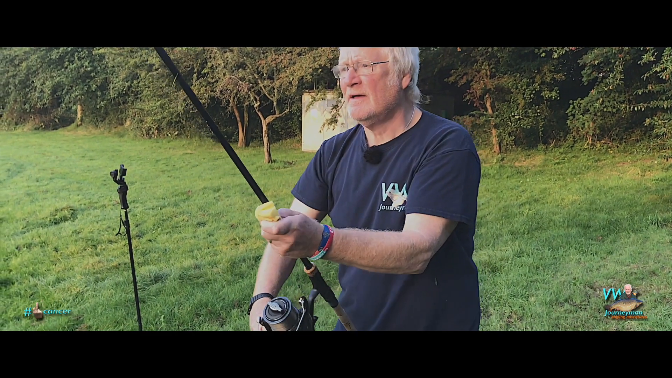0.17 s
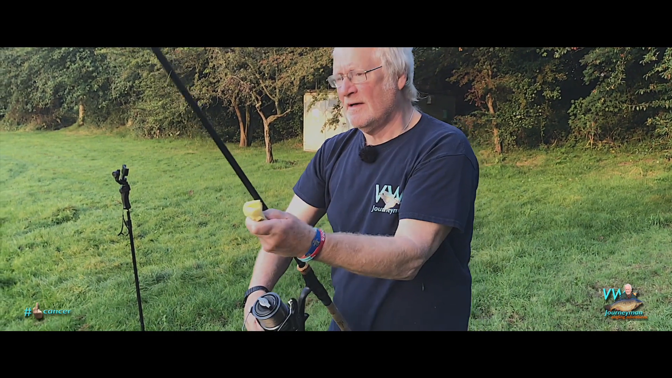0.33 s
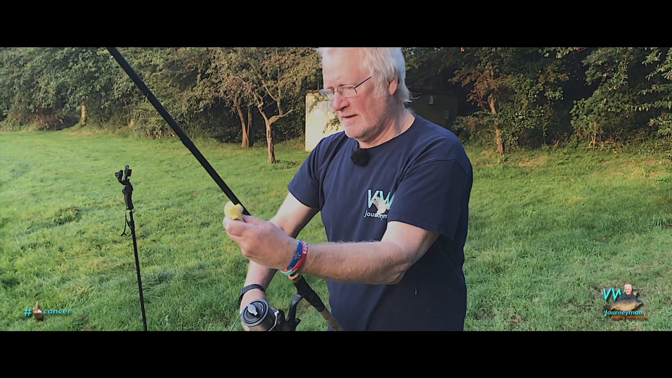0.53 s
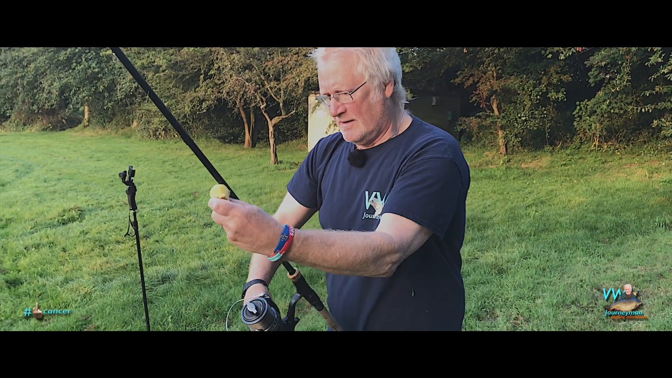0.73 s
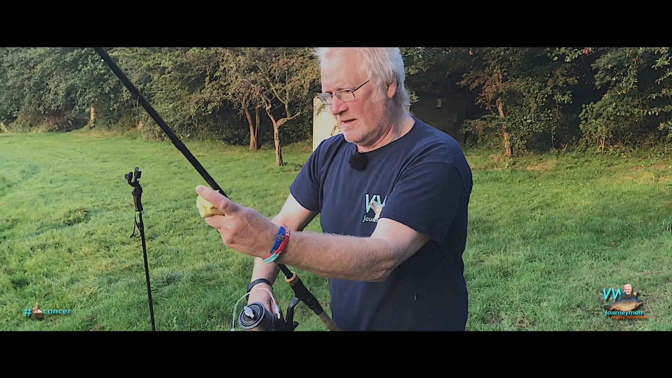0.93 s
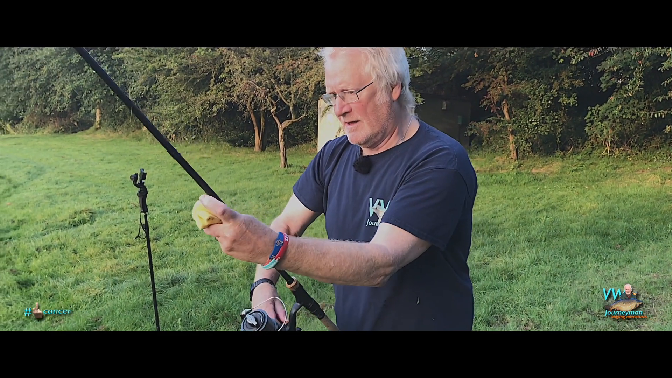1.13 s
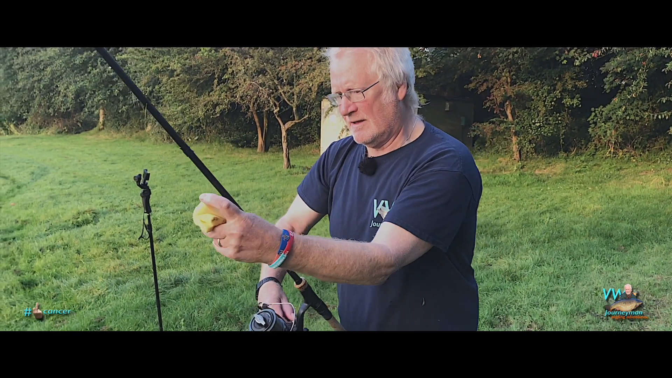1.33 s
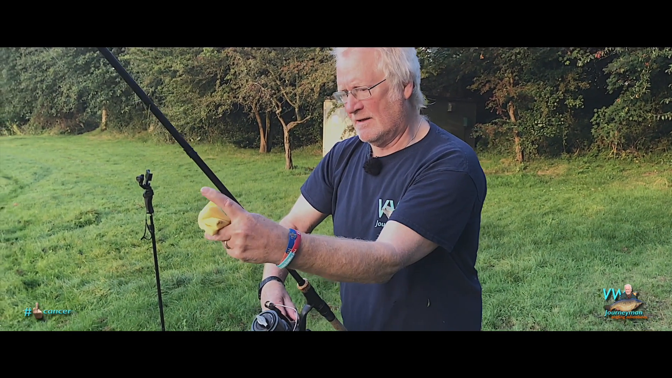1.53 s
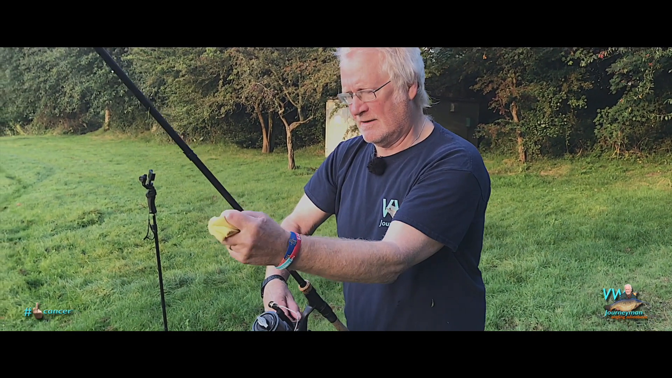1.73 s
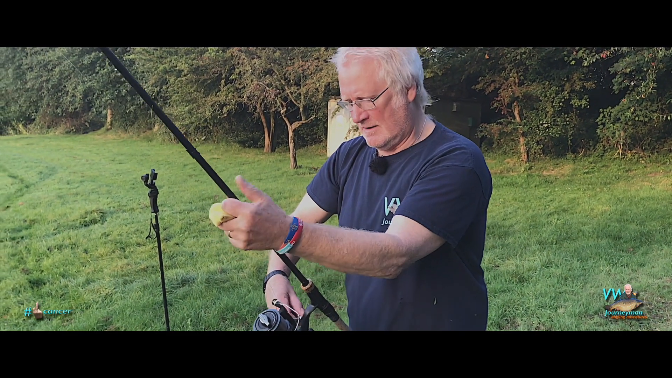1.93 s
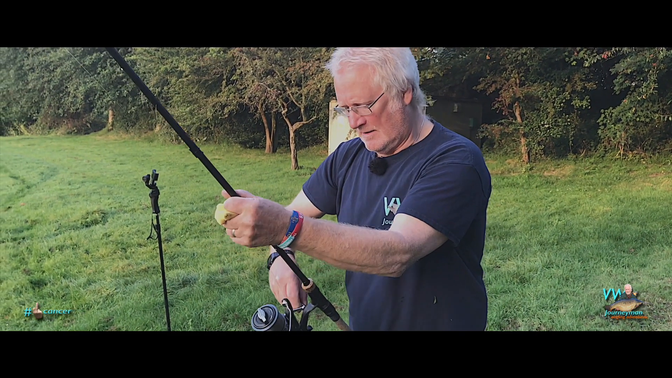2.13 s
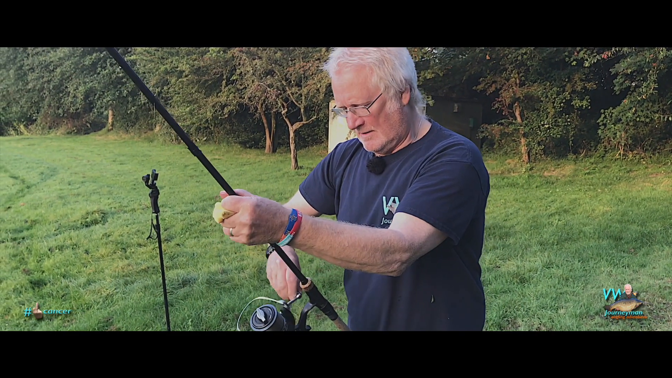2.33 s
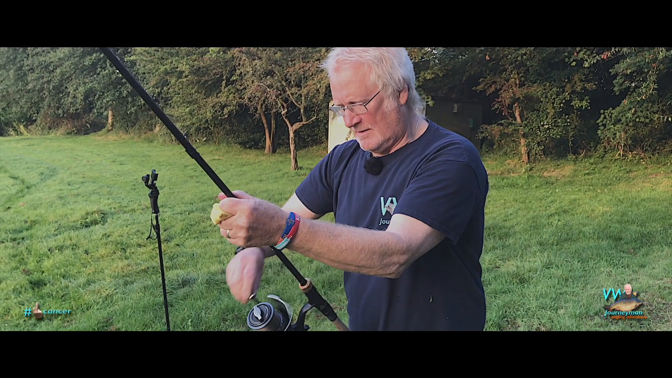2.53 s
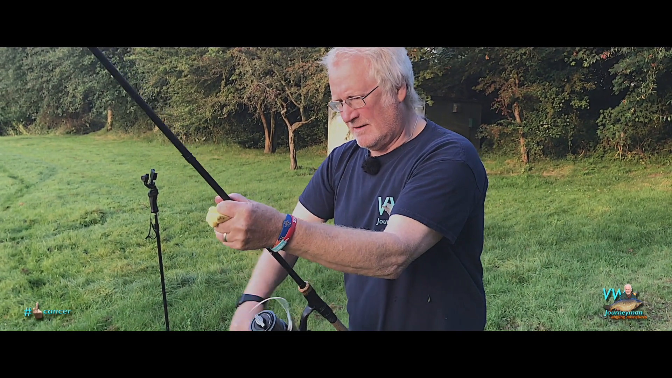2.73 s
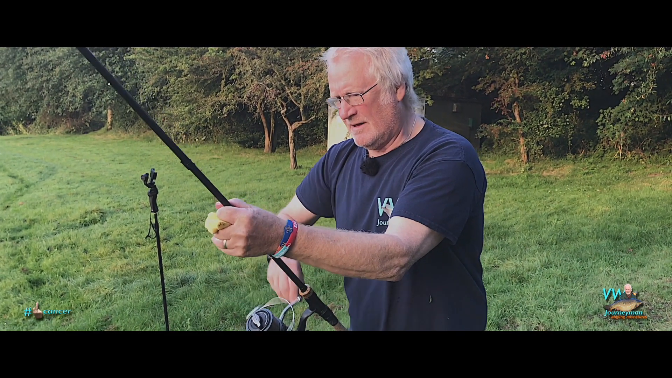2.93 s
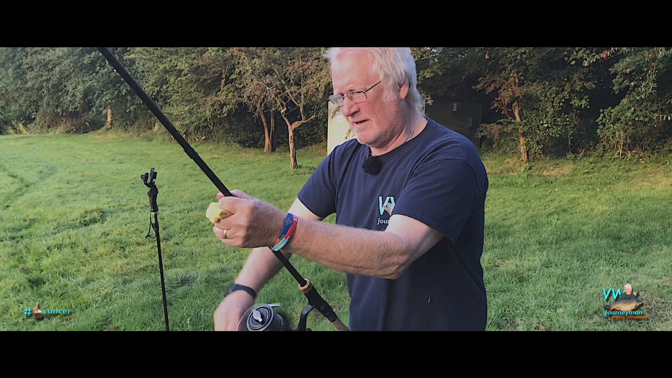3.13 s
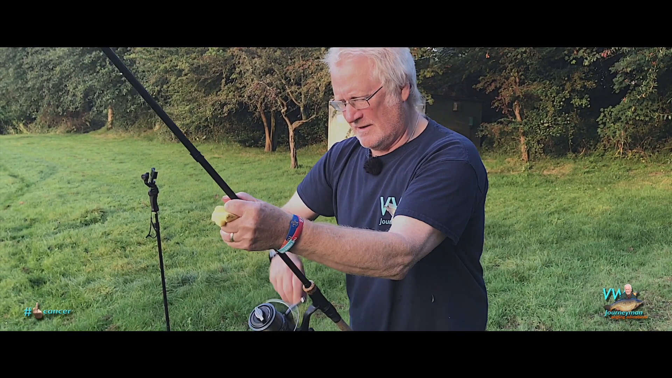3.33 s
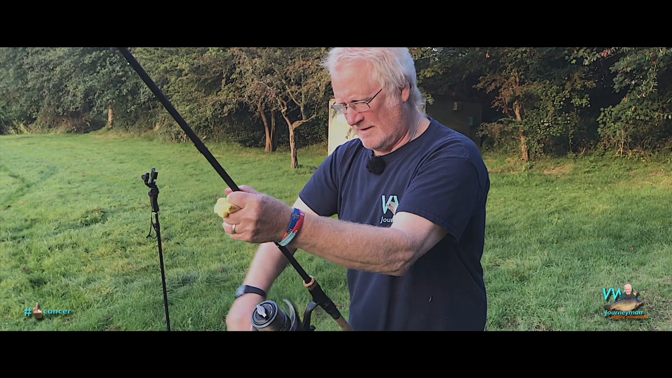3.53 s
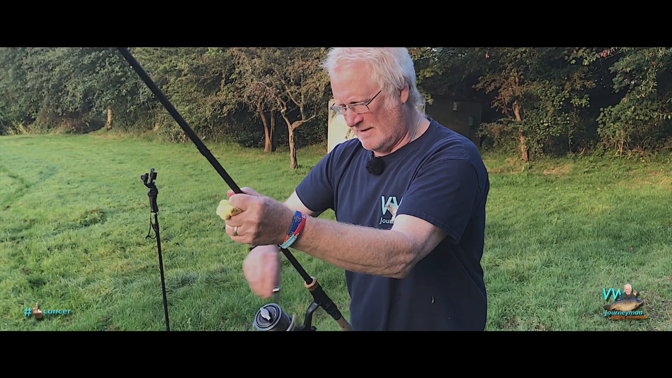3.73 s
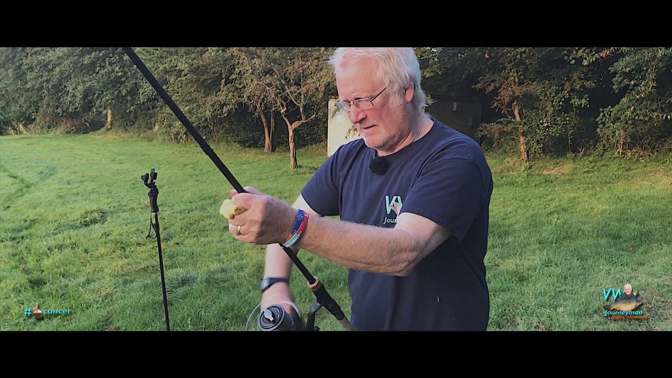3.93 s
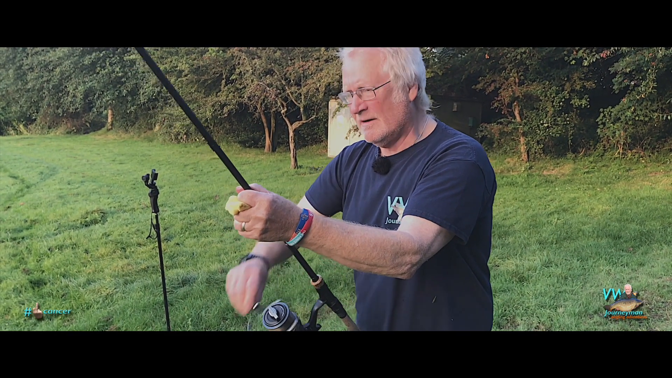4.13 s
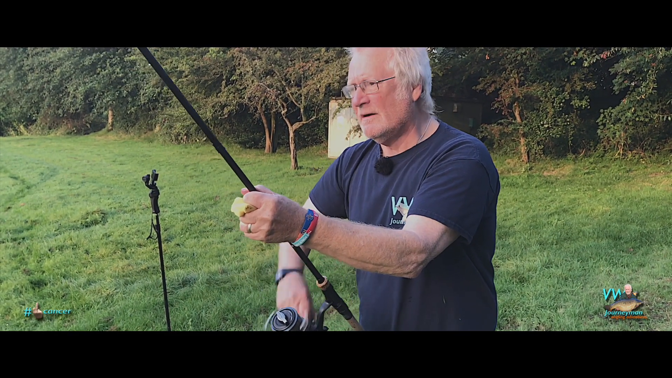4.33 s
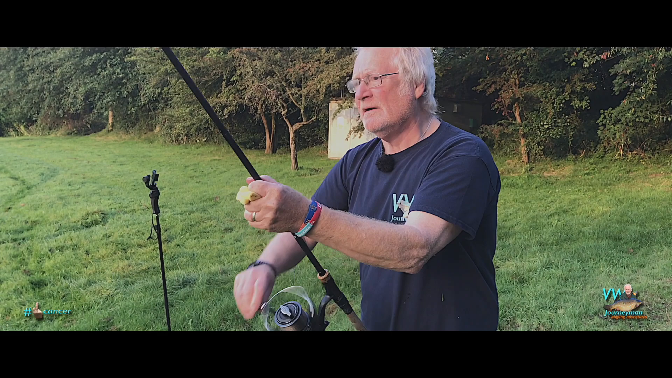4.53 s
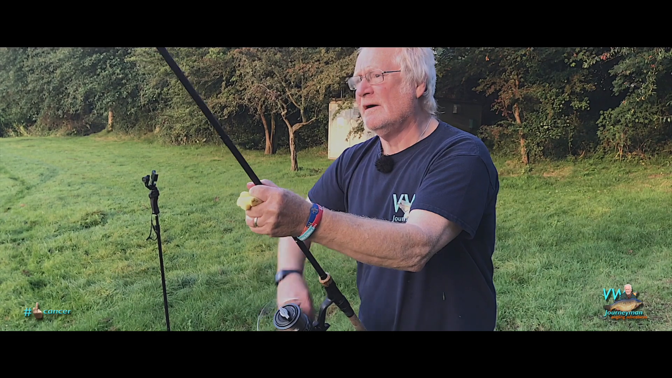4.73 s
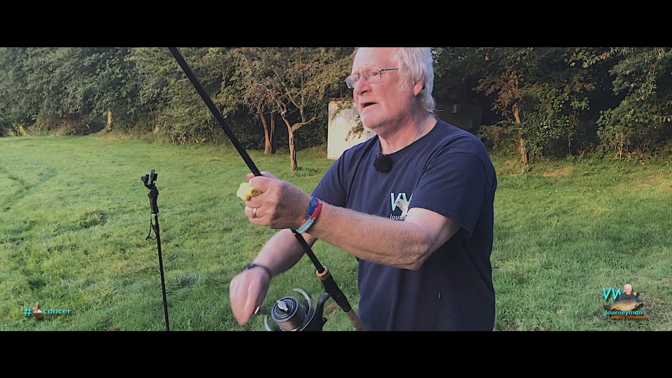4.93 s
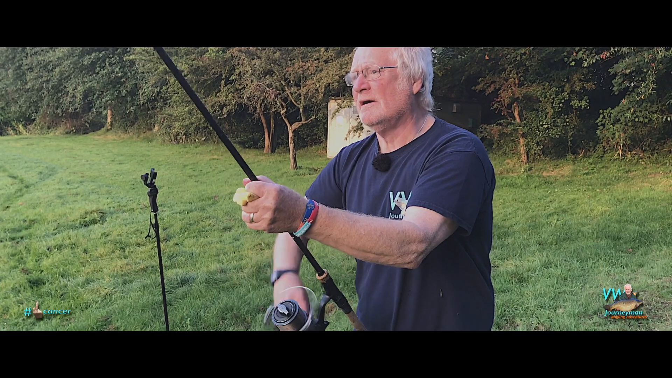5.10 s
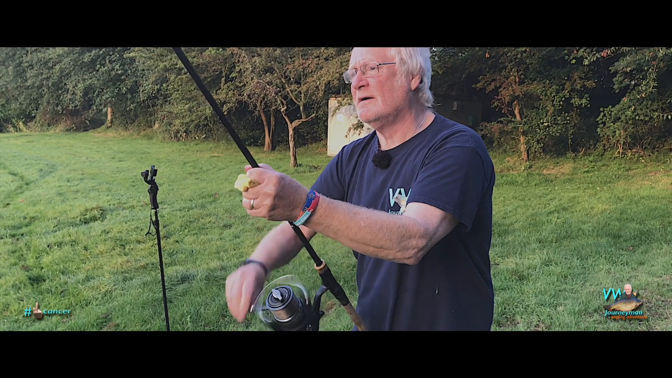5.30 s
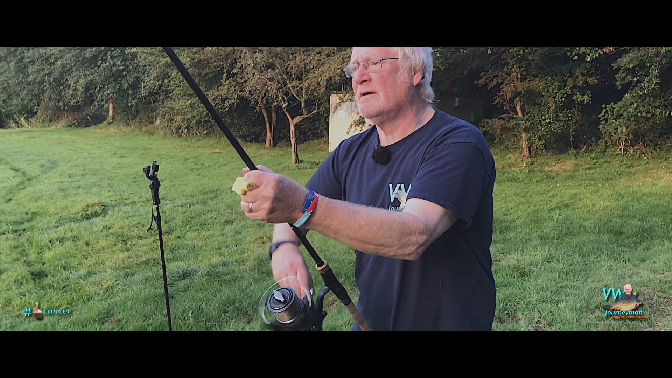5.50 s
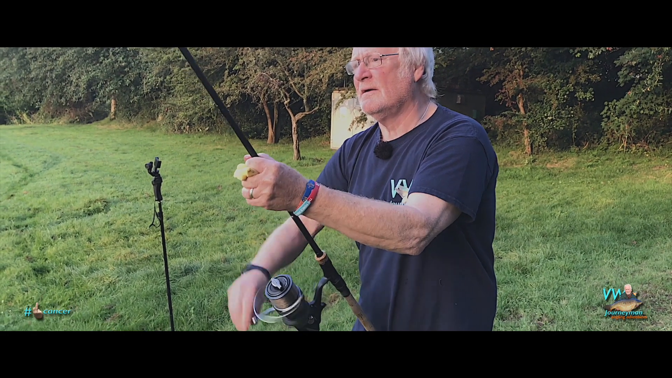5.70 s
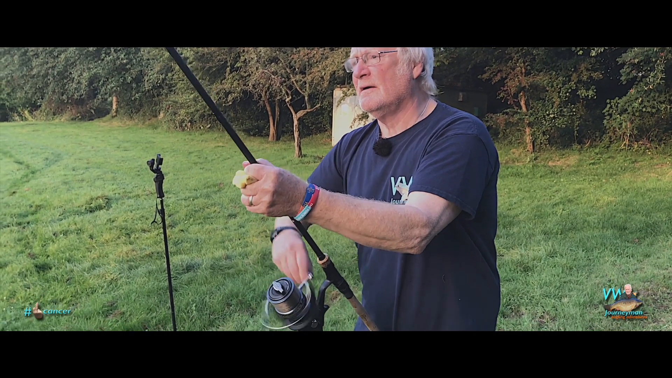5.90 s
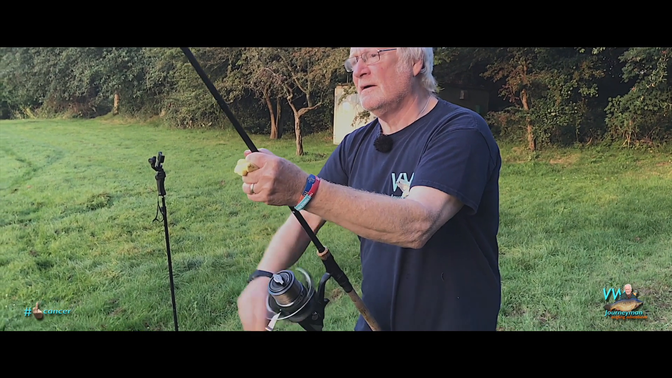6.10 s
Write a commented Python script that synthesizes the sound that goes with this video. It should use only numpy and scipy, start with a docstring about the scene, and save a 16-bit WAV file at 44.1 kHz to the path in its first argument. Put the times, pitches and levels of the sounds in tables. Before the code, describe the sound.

The opening is very quiet: a soft park hush, a low hum of far traffic, a faint distant twitter and a few tiny ticks. A fishing reel's handle creaks softly twice, at about 0.5 and 0.9 seconds. From 0.7 to 2.2 seconds a songbird sings five slightly hoarse notes, two of them trilled, with a little echo from the trees.

At about 2.2 seconds the reel begins winding line through a hand-held sponge, much louder and close to a lapel microphone. Separate clicks speed up by 2.5 seconds into a fine, fizzing buzz. Each turn adds a short gritty rasp with a hollow rub, quickening from roughly ten to fourteen a second. A thin, wavering squeak pulses along from about 3.8 to 5 seconds, strongest around 4.4 and 4.8. The clicking, hissing and rasping carry on steadily until the end, just after 6 seconds.

```python
"""Winding a fishing reel in a park

A reel winds line through a hand-held sponge, heard by a lapel microphone. The tight line sticks
and slips in fast clicks; once per turn of the reel's rotor it rasps harder, then goes slack.
Before the winding, the handle creaks twice and a songbird trills and whistles.
Behind it all the park hums softly, with a faint twitter at the start."""
import sys
import numpy as np
from scipy import signal
from scipy.fft import rfft, irfft, next_fast_len
from scipy.io import wavfile
from scipy.ndimage import uniform_filter1d, map_coordinates

SR = 44100
rng = np.random.default_rng(int(sys.argv[2]) if len(sys.argv) > 2 else 0)


def pcm_store(signal):
    """Save signal as 16-bit PCM."""
    levels = np.round(np.clip(np.atleast_2d(signal), -1, 1) * 32767)
    wavfile.write(sys.argv[1], SR, levels.astype(np.int16).T)


N = 271561
T = np.arange(N) / SR

# Rotor turns: t/s, rasp level/dB, rasp length/ms, rough wait between slips once the line is slack/ms
ROTOR_TURNS = [(2.483, -36.5, 47, 15), (2.583, -48, 27.3, 6.3), (2.624, -45, 51, 17.2),
               (2.726, -36, 48.5, 13), (2.833, -43, 52, 8.8), (2.925, -38.5, 32.6, 16.4),
               (3.023, -43.5, 23.4, 8), (3.096, -42.5, 39, 8.1), (3.17, -46, 43, 12),
               (3.24, -44.5, 26.3, 7.5), (3.321, -44, 29.3, 9.6), (3.399, -46.5, 22.4, 6.7),
               (3.487, -49, 56, 7.6), (3.585, -47.5, 24.3, 5.9), (3.643, -56, 38.6, 8.6),
               (3.712, -46, 34.3, 7.5), (3.775, -46, 29, 8), (3.844, -41, 24.7, 10),
               (3.902, -42, 34.4, 7.1), (3.958, -44.5, 21, 9.5), (4.029, -41, 30, 7.7),
               (4.101, -39, 28, 8.9), (4.178, -43.5, 27.2, 7.3), (4.242, -42.5, 34, 8.9),
               (4.312, -40, 25.3, 16), (4.382, -39.5, 34.4, 9), (4.474, -40, 42.5, 9.1),
               (4.553, -38, 29.6, 8.6), (4.629, -40, 24, 8.1), (4.697, -41, 27.8, 9.2),
               (4.766, -39, 26.2, 11), (4.851, -40, 22.5, 11), (4.925, -42, 26, 8), (4.985, -39, 20, 6),
               (5.054, -44.5, 33, 5.17), (5.114, -42.5, 20.1, 7.5), (5.184, -38, 32.7, 10.1),
               (5.26, -41.5, 22, 7), (5.327, -43.5, 23, 8.9), (5.381, -46, 25, 8.9),
               (5.448, -43.5, 25.7, 9.5), (5.517, -41.5, 36, 12), (5.596, -39.5, 33.3, 7.5),
               (5.67, -40, 22, 7.8), (5.738, -43.5, 28.4, 9.2), (5.806, -40, 22.8, 8),
               (5.873, -40, 28.7, 9.6), (5.948, -40.5, 25.6, 16.2), (6.027, -46, 20.4, 7.9),
               (6.089, -40, 18.2, 12.8)]


def amp(db):
    """Turn decibels into a gain."""
    return 10 ** (np.asarray(db) / 20)


def unit(x):
    """Scale a signal to an average (RMS) strength of 1."""
    return x / np.sqrt(np.mean(x ** 2) + 1e-20)


def curves(rows):
    """Join the rows with straight lines: one curve for each column after the time."""
    times, *columns = np.transpose(rows)
    return [np.interp(T, times, column) for column in columns]


def during(rows, fade_s):
    """1 between the first and last row's times, with short fades."""
    return np.clip(np.minimum(T - rows[0][0], rows[-1][0] - T) / fade_s, 0, 1)


def wobble(rate):
    """A smooth curve through `rate` random values a second."""
    return map_coordinates(rng.standard_normal(int(N * rate / SR) + 4), [T * rate])


def bumps(times, heights, width_s):
    """A bell-shaped swell at each time."""
    out, t = np.zeros(N + SR), np.arange(-SR // 10, SR // 10) / SR
    for s, height, width in np.broadcast(times, heights, width_s):
        out[round(s * SR) - SR // 10:][:len(t)] += height * np.exp(-.5 * (t / width) ** 2)
    return out[:N]


def filtered(x, response):
    """Multiply each frequency in x by response(frequency)."""
    size = next_fast_len(N + 8192)
    return irfft(rfft(x, size) * response(np.fft.rfftfreq(size, 1 / SR)), size)[:N]


def coloured(x, points):
    """Shape the lows and highs of x by rows of f/Hz, level/dB."""
    f, db = np.transpose(points)
    return filtered(x, lambda hz: amp(np.interp(np.log(hz + 1), np.log(f), db, -120, -120)))


def ring(x, modes):
    """Let x ring at a few pitches, given as rows of f/Hz, width/Hz, level/dB."""
    return filtered(x, lambda f: sum(
        (-1) ** k * amp(db) * 1j * f * width / (hz * hz - f * f + 1j * f * width)
        for k, (hz, width, db) in enumerate(modes)))


def fuzzy_tone(hz, width, db=0):
    """Noise narrowed twice around one pitch."""
    return ring(ring(rng.standard_normal(N), [(hz, width, db)]), [(hz, width, 0)])


def pulses(rate, scatter_db):
    """One-sample clicks, `rate` a second, with random scatter in level."""
    clicks = np.diff(np.floor(np.cumsum(rate) / SR), prepend=0)
    return clicks * amp(scatter_db * rng.standard_normal(N))


def dying(x, t60):
    """Each click becomes a burst of noise that falls 60 dB in t60 seconds."""
    return signal.lfilter([1], [1, -amp(-60 / (t60 * SR))], x) * rng.standard_normal(N)


def grit(rate, spike_db):
    """Noise of many tiny scratches, whose colour shifts in random patches."""
    scratches = rng.standard_normal(N) * amp(spike_db * wobble(rate))
    spectrum = signal.stft(scratches, nperseg=256)[2]
    patches = uniform_filter1d(rng.standard_normal(spectrum.shape), size=7, axis=0)
    patches = uniform_filter1d(patches, size=5, axis=1)
    return unit(signal.istft(spectrum * amp(2 * unit(patches)), nperseg=256)[1][:N])


def park():
    """Far traffic, two faint wavering tones and a hush that swells as the winding starts."""
    # Background loudness: t/s, hush/dB, low tone/dB, high tone/dB
    levels = [(0, -79.5, -82, -105), (.2, -73.5, -79, -105), (.4, -75, -73, -105), (.55, -76.5, -73, -105),
              (.85, -79, -98, -105), (1.0, -77, -80, -105), (1.3, -77, -80, -100), (1.5, -76, -80, -90),
              (1.66, -83, -86, -101), (1.85, -77, -79.5, -100), (2.0, -66, -60, -95),
              (2.1, -68.5, -59, -78), (2.2, -58.5, -60, -92), (2.35, -62, -79, -98), (6.2, -62, -100, -96)]
    # Colour of the hush: f/Hz, level/dB
    hush_colour = [(150, -37), (230, -6), (366, -0.5), (480, -0.5), (1000, -1), (1500, -1.5), (2000, -12),
                   (2300, -3.5), (2730, -9), (3100, -13), (3540, -13), (4200, -22), (5000, -26),
                   (6300, -17.5), (15700, -35.5)]
    # The low and the high tone: f/Hz, width/Hz
    pitches = [(1800, 160), (3430, 41)]
    # Rumble of far traffic: f/Hz, level/dB
    traffic_colour = [(21, -34), (35, -10), (45, 1), (65, 5), (139, -5), (195, -10.5), (220, -22),
                      (290, -34), (480, -120)]
    hush_db, low_db, high_db = curves(levels)
    dip = np.clip(np.minimum(T - 1.482, 1.653 - T) / .014 + .5, 0, 1)  # hush and low tone dip briefly
    hush = amp(hush_db - 19 * dip) * unit(coloured(grit(20, spike_db=1.2), hush_colour))
    tones = sum(amp(db + 2.5 * wobble(20)) * unit(fuzzy_tone(hz, width))
                for (hz, width), db in zip(pitches, [low_db - 13 * dip, high_db]))
    traffic = amp(-82 + 1.4 * wobble(2)) * unit(coloured(rng.standard_normal(N), traffic_colour))
    return hush + tones + traffic


def twitter():
    """A faint wavering twitter from far trees."""
    # Pitches of the twitter: f/Hz, width/Hz, level/dB
    pitches = [(2250, 85, -2), (2696, 120, -2), (3530, 280, -4)]
    # Its loudness: t/s, level/dB
    levels = [(0, -80), (.25, -76.5), (.5, -81.5), (.75, -80), (.8, -120)]
    voices = sum(amp(3.8 * wobble(26)) * fuzzy_tone(*pitch) for pitch in pitches)
    return amp(curves(levels)[0]) * unit(voices)


def bird():
    """Slightly hoarse notes, two of them trilled, smeared by echoes from the trees."""
    # One list per note: t/s, f/Hz, level/dB, trill depth/Hz
    notes = [
        [(.738, 2440, -75, 119), (.744, 2440, -67, 130), (.765, 2436, -63.5, 129), (.85, 2284, -64, 117),
         (.93, 2280, -60.5, 90), (.942, 2280, -62, 90)],
        [(1.015, 3250, -84, 0.0044), (1.031, 3410, -80, 0), (1.097, 3450, -81, 0), (1.123, 3500, -74, 0),
         (1.165, 2715, -60, 0), (1.177, 2710, -65, 0), (1.187, 2010, -53, 0.0077)],
        [(1.452, 1990, -76, 168), (1.48, 2020, -73.5, 164), (1.55, 2080, -69, 147), (1.63, 2018, -67.5, 100),
         (1.67, 1980, -70, 43), (1.695, 1795, -76, 2), (1.71, 1710, -77, 0)],
        [(1.757, 2160, -82, 0.0035), (1.771, 2190, -70, 0), (1.803, 2030, -70, 0), (1.825, 1680, -77, 0),
         (1.835, 1480, -70, 0)],
        [(2.085, 1936, -60, 0), (2.113, 2125, -64, 0), (2.157, 2220, -60, 0), (2.181, 2150, -59, 0),
         (2.205, 2030, -64, 0)],
    ]
    trill_hz, echo_samples = 82, SR // 4
    song = np.zeros(N)
    for note in notes:
        hz, db, depth_hz = curves(note)
        waver_hz = depth_hz * np.sin(2 * np.pi * trill_hz * T) + 15 * wobble(300)
        whistle = np.sin(2 * np.pi * np.cumsum(hz + waver_hz) / SR)
        song += during(note, fade_s=.0045) * amp(db + 6 + 1.9 * wobble(130)) * whistle
    echo_fade = amp(-60 * T[:echo_samples] / .3)
    trees = unit(echo_fade * rng.standard_normal(echo_samples)) / np.sqrt(echo_samples)
    return song + amp(-10) * signal.fftconvolve(song, trees)[:N]


def handle():
    """The handle sticks and slips in two creaks, and gives a few tiny ticks."""
    # One list per creak: t/s, slip rate/Hz, level/dB
    creaks = [
        [(.51, 158, -81), (.55, 170, -72), (.58, 245, -73.5), (.62, 208, -68.5), (.65, 160, -64.5),
         (.675, 114, -67), (.69, 91, -68.5), (.71, 70, -71)],
        [(.85, 113, -76), (.88, 160, -74.5), (.92, 170, -63.5), (.95, 182, -66), (.98, 160, -67),
         (1.0, 65, -70)],
    ]
    # Colour of the rubbing in a creak: f/Hz, level/dB
    rub_colour = [(150, -59), (250, -29), (282, -12), (797, -6.5), (915, -4), (1460, -4.5), (1990, -9),
                  (2170, -18), (3720, -9.5), (5160, -25.5), (9960, -25), (15600, -52)]
    # Tiny ticks: t/s, level/dB
    tick_levels = [(0.0692, -62), (0.2165, -55), (0.2313, -59), (1.702, -68.5), (1.757, -66), (1.9754, -67)]
    # How snaps and ticks ring: f/Hz, width/Hz, level/dB
    snap_modes = [(4020, 2500, -5), (6300, 1700, 0), (9900, 1700, -5.5), (12700, 1600, -8)]
    tick_modes = [(6650, 3600, -2), (3480, 1100, 2.5), (10000, 1500, -4.5)]
    creaking, ticks = np.zeros(N), np.zeros(N)
    for creak in creaks:
        rate, db = curves(creak)
        slips = pulses(rate * amp(.49 * wobble(100)), scatter_db=1)
        rub = unit(coloured(dying(slips, t60=.048), rub_colour))
        snaps = amp(.5 * (db - db.max()) - 7) * unit(ring(slips, snap_modes))  # harder is brighter
        creaking += during(creak, fade_s=.0055) * amp(db) * (rub + snaps)
    for s, db in tick_levels:
        ticks[round(s * SR)] = amp(db - 4.5)
    return creaking + ring(dying(ticks, t60=.03), tick_modes)


def line_rasps():
    """Once a turn the line drags hard: a gritty swell, a hollow rub and at times a lingering squeak."""
    # Colour of the gritty swell: f/Hz, level/dB
    rasp_colour = [(530, -12), (900, -5), (1080, -7), (1380, -4), (1780, -6), (2400, -10.5), (3680, -1),
                   (4100, -5), (4510, -6.5), (5080, -11), (6010, -7.5), (6530, -13.5), (9130, -14),
                   (12300, -21), (15600, -35)]
    # Colour of the hollow rub: f/Hz, level/dB
    rub_colour = [(90, -27), (130, -12.5), (200, -19.5), (330, -2), (430, -5.5), (565, 3.5), (700, -1.5),
                  (830, 0.5), (1100, -22), (1500, -40)]
    # The squeak's path: t/s, f/Hz, level/dB
    squeak_path = [(3.3, 1480, -80), (3.8, 1443, -57), (4.2, 1323, -50), (4.43, 1299, -44),
                   (4.6, 1252, -51.5), (4.82, 1283, -46), (5.15, 1360, -64), (5.5, 1399, -80)]
    turn_s, rasp_db, rasp_ms, _ = np.transpose(ROTOR_TURNS)
    rub_db = -54.5 + 2.5 * rng.standard_normal(len(turn_s))
    build_up = np.clip(.3 + (turn_s - turn_s[0]) / .34, 0, 1)  # the first rubs are weaker
    rub_swell = bumps(turn_s + .0032, amp(rub_db) * build_up, width_s=.014)
    rasp_swell = bumps(turn_s, amp(rasp_db - 2.5), width_s=rasp_ms / 2800)
    squeak_hz, squeak_db = curves(squeak_path)
    drag = bumps(turn_s + .005, amp(rasp_db + 41), width_s=.012) + .25 * (T > turn_s[0])
    squeak_gain = amp(squeak_db + 2.5 * wobble(60)) * drag
    squeak = squeak_gain * np.sin(2 * np.pi * np.cumsum(squeak_hz + 30 * wobble(120)) / SR)
    scratches = amp(1.2 * wobble(120)) * grit(1200, spike_db=2)
    rasp = rasp_swell * unit(coloured(scratches, rasp_colour))
    rub = rub_swell * unit(coloured(rng.standard_normal(N), rub_colour))
    return rasp + squeak + rub


def line_slips():
    """The line hisses, sticks and slips, slowest when slack after a rasp; each slip clicks and fizzes."""
    # The first slow slips: t/s, level/dB, fizz compared with that level/dB
    first_slips = [(2.1586, -45.5, -13), (2.1757, -45, -22), (2.188, -44, -20), (2.1967, -40, -23),
                   (2.205, -44, -26), (2.2143, -41, -20), (2.223, -40, -19), (2.233, -37.5, -18),
                   (2.244, -42, -5.5), (2.2536, -40, -14.5), (2.267, -40.5, -15), (2.2832, -39.5, -7.5),
                   (2.3014, -39, -13), (2.3208, -38.5, -15), (2.3368, -39.5, -6), (2.3581, -38, -8),
                   (2.375, -36.5, -8.5), (2.393, -36.5, -5), (2.413, -38, -16), (2.4288, -36.5, -25),
                   (2.443, -38, -20), (2.4512, -39, -26), (2.46, -35.5, -25)]
    # Loudness as the line is pulled: t/s, clicks/dB, hiss/dB
    pull = [(2.14, -63, -83), (2.16, -63, -66), (2.23, -63, -64), (2.34, -58, -54.5), (2.43, -51, -54.5),
            (2.55, -51, -49), (2.95, -52.5, -50), (3.15, -51, -51.5), (3.4, -53.5, -48), (3.47, -48, -44),
            (3.6, -51, -51.5), (3.8, -48, -47.5), (4.3, -50, -48.5), (4.55, -51, -50), (4.9, -50, -48.5),
            (5.25, -50, -51), (5.45, -49, -46.5), (5.95, -51.5, -49), (6.16, -47.5, -43.5)]
    # How a click rings: f/Hz, width/Hz, level/dB
    click_modes = [(430, 495, -15.5), (1410, 674, -2), (1804, 457, 2), (2160, 140, -19.5),
                   (3400, 720, -24.5)]
    # How fizz and hiss ring: f/Hz, width/Hz, level/dB
    fizz_modes = [(3670, 870, 3), (4940, 730, -1), (5500, 1100, -4), (8200, 800, -8), (8940, 600, -7.5),
                  (10500, 1140, -11), (11200, 470, -13.5), (12760, 650, -17.5)]
    click_db, hiss_db = curves(pull)
    turn_s, _, rasp_ms, slack_ms = np.transpose(ROTOR_TURNS)
    winding = T > first_slips[-1][0]
    slack_s = turn_s + .62 * rasp_ms / 1000
    usual_wait_ms, slack_width_s = 2.85, .0088
    tight_ms = usual_wait_ms * amp(.4 * wobble(12))
    wait_ms = tight_ms + bumps(slack_s, np.abs(slack_ms - usual_wait_ms), slack_width_s)
    rate = 1000 / wait_ms * amp(.5 * wobble(150) + .8 * wobble(25))
    slips = pulses(rate * winding, scatter_db=0)
    slips *= (wait_ms / tight_ms) ** .25  # a longer wait stores a bigger slip
    click_scale = 1 / np.std(ring(slips, click_modes)[winding])
    click_db -= bumps(slack_s, 1.5, slack_width_s * .78)  # slack line clicks more softly
    gap_s = np.diff(turn_s)
    lull_s = turn_s + .56 * np.append(gap_s, gap_s[-1])  # the hiss sinks between turns
    hiss_db = hiss_db - bumps(lull_s, 2.5, width_s=.012) + 1.15 * wobble(13)
    clicks = amp(click_db + .5) * click_scale * slips
    fizz = amp(hiss_db - 22) * slips
    for s, db, fizz_db in first_slips:
        clicks[round(s * SR)] = amp(db - 7) * click_scale
        fizz[round(s * SR)] = amp(db + fizz_db - 3)
    hiss = amp(hiss_db - 4.5 + 1.2 * wobble(60)) * grit(900, spike_db=6) * (T > pull[0][0])
    ring_gain = np.std(ring(rng.standard_normal(N), fizz_modes))
    chatter = amp(-36) * dying(clicks, t60=.08)  # the spool keeps buzzing between slips
    sizzle = ring(dying(fizz, t60=.041) + hiss, fizz_modes) / ring_gain
    return ring(clicks + chatter, click_modes) + sizzle


def scene():
    """The reel, the bird and the park, added into one channel."""
    return (line_slips() + line_rasps() + handle() + bird() + twitter() + park())[None]


def record(dry):
    """Cut away the very highest treble."""
    top_hz = 15780
    return filtered(dry[0], lambda hz: hz < top_hz)[None]


dry = scene()
out = record(dry)
pcm_store(out)
```